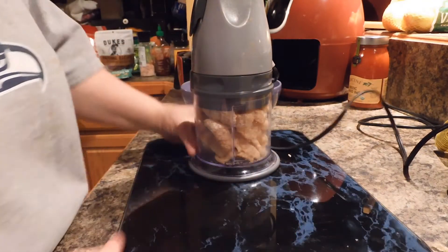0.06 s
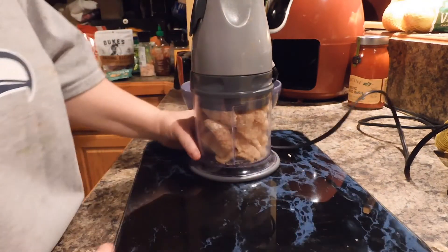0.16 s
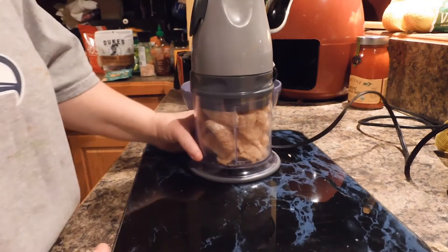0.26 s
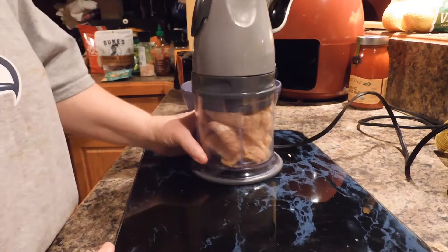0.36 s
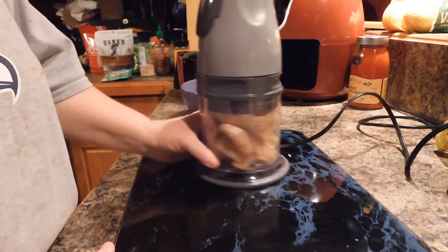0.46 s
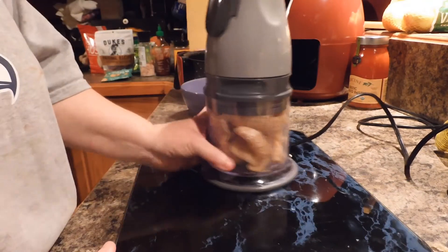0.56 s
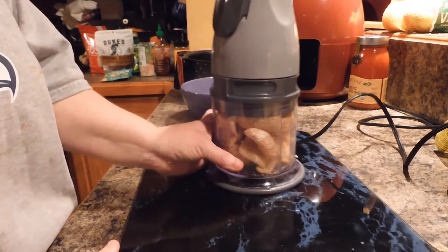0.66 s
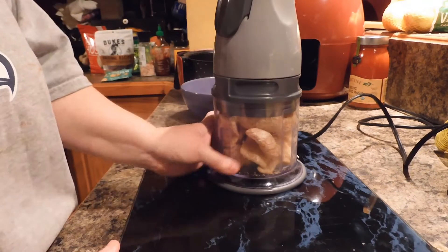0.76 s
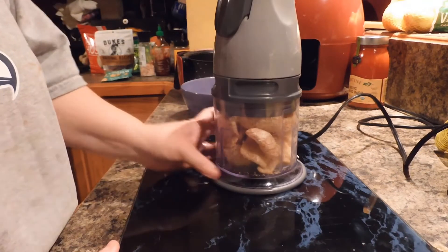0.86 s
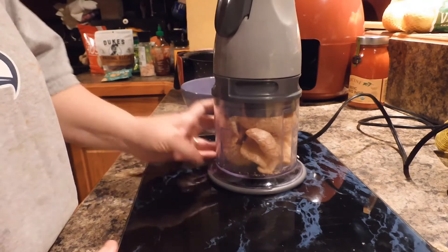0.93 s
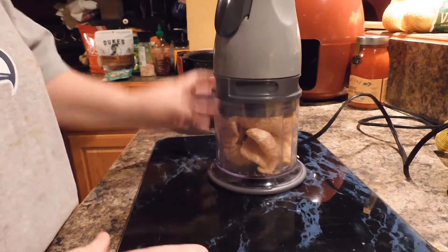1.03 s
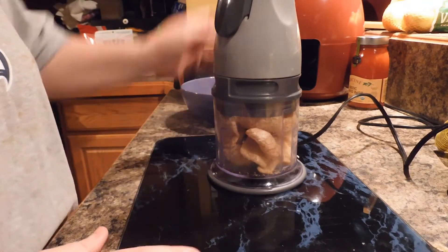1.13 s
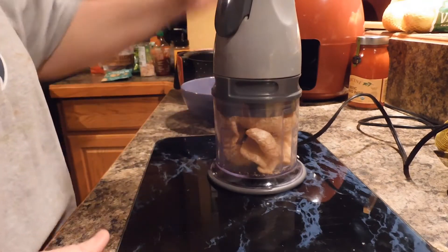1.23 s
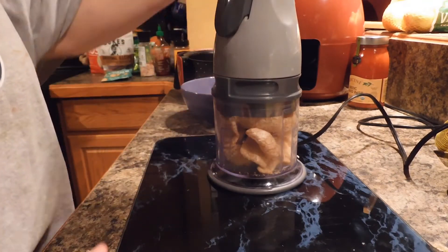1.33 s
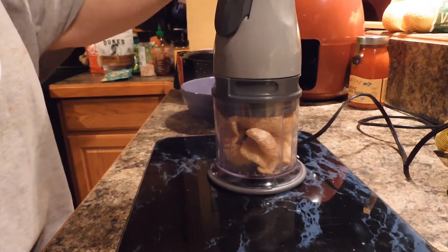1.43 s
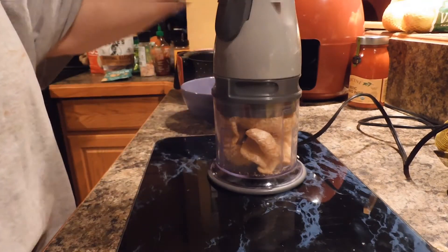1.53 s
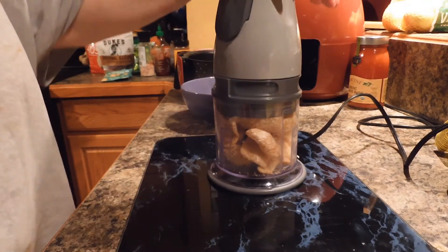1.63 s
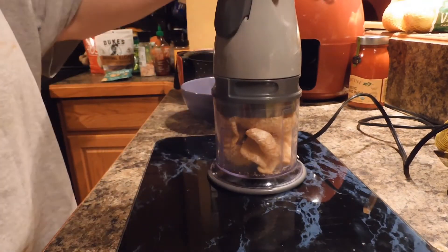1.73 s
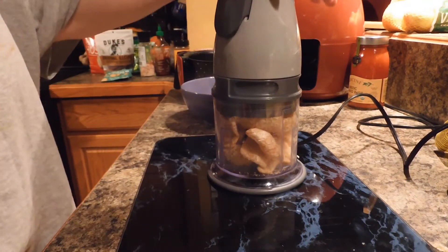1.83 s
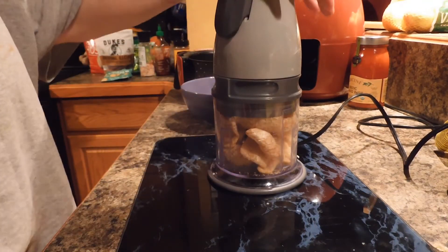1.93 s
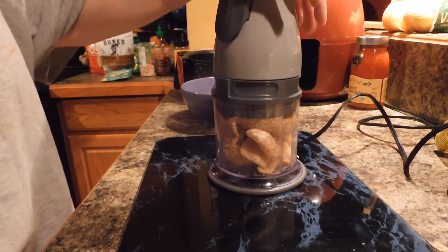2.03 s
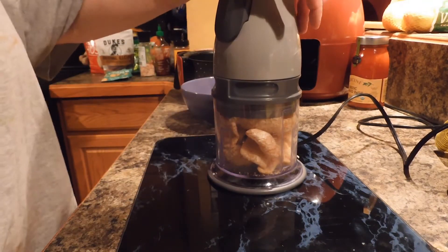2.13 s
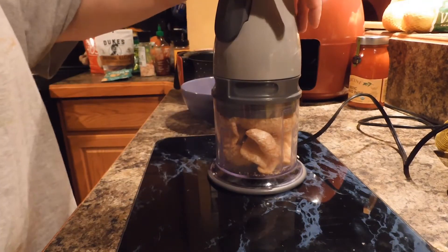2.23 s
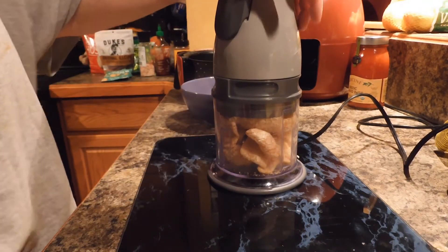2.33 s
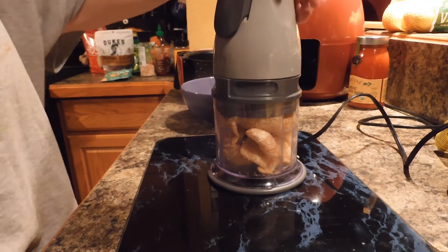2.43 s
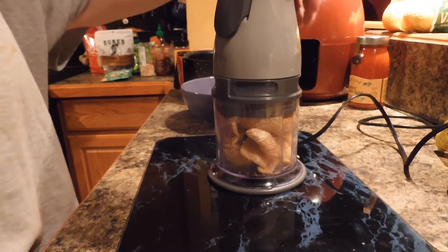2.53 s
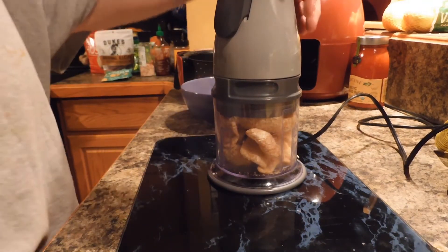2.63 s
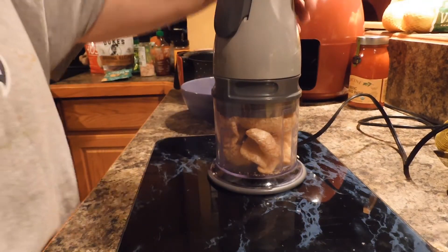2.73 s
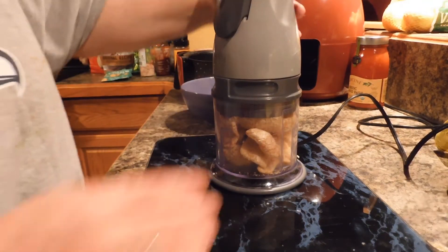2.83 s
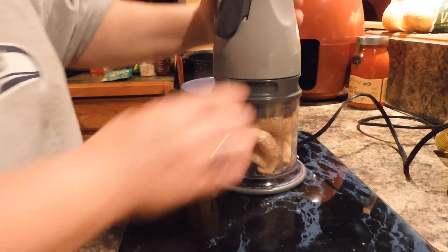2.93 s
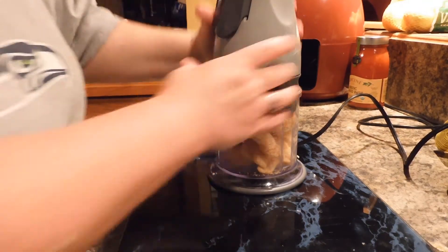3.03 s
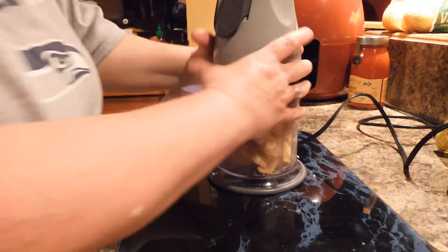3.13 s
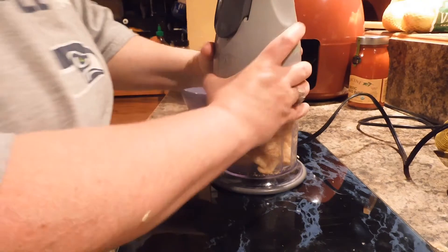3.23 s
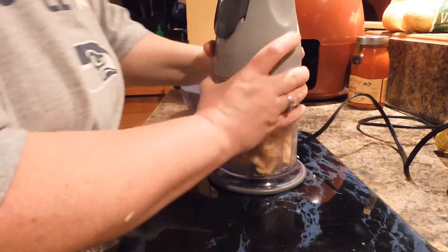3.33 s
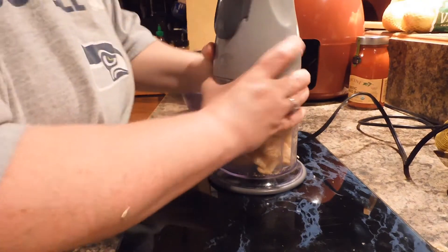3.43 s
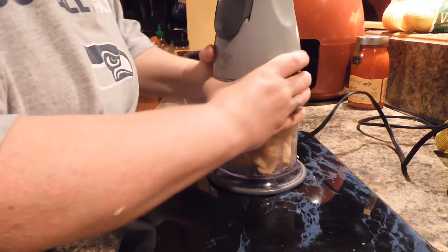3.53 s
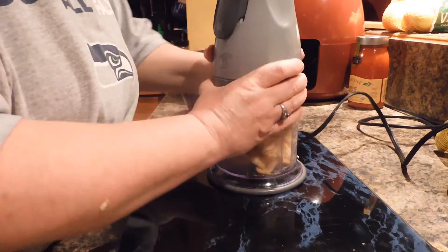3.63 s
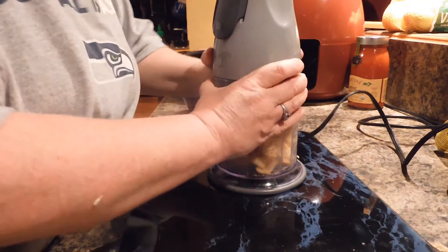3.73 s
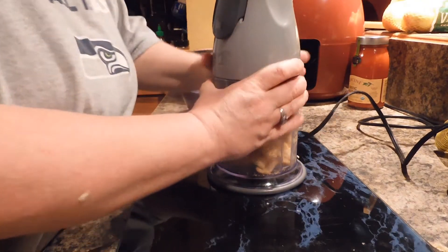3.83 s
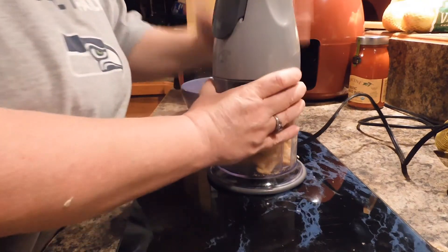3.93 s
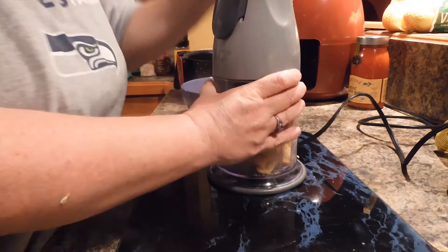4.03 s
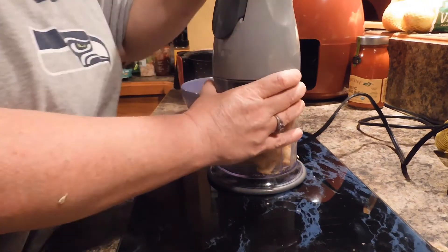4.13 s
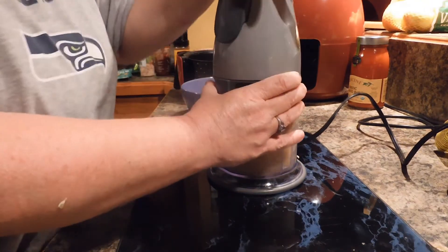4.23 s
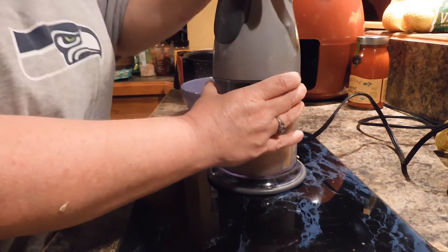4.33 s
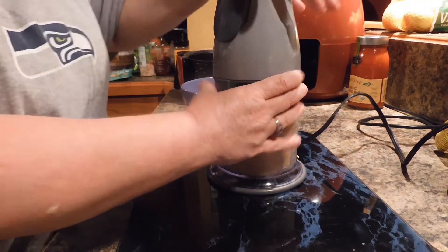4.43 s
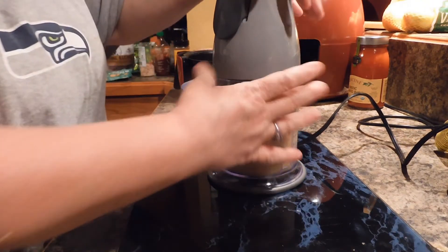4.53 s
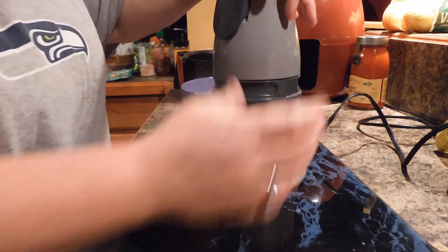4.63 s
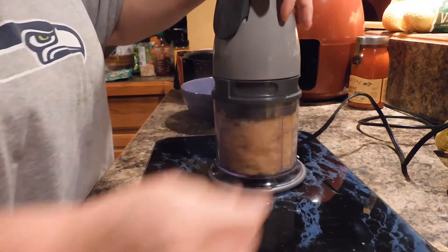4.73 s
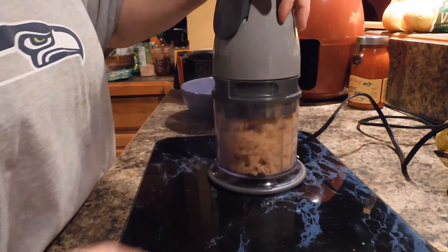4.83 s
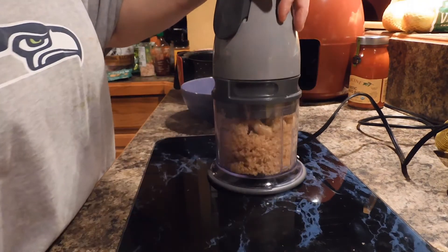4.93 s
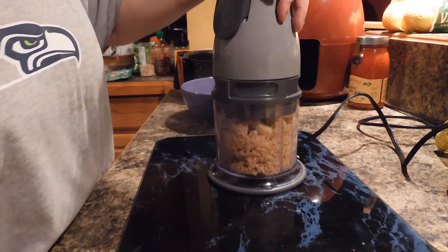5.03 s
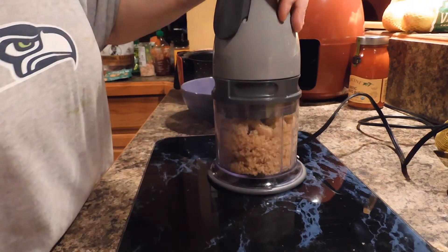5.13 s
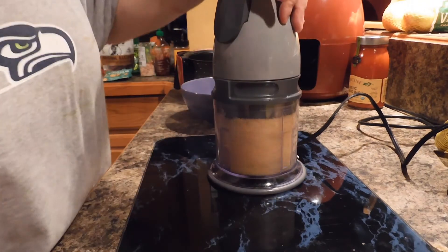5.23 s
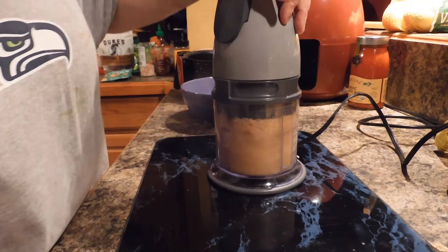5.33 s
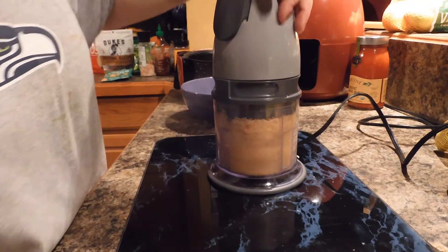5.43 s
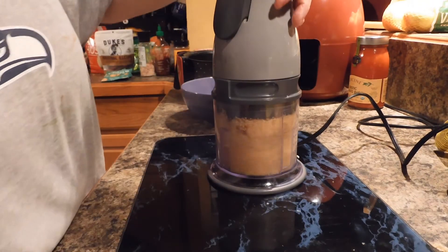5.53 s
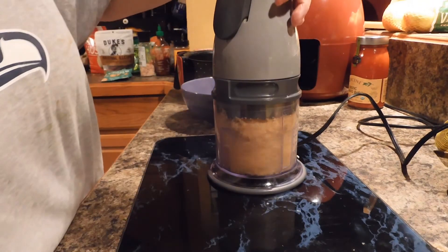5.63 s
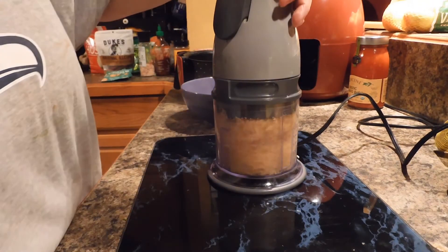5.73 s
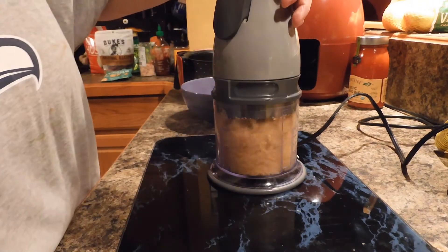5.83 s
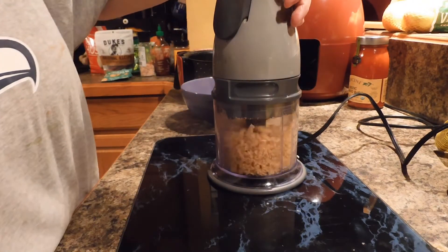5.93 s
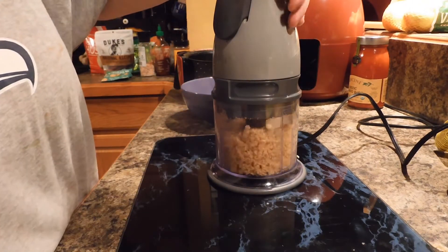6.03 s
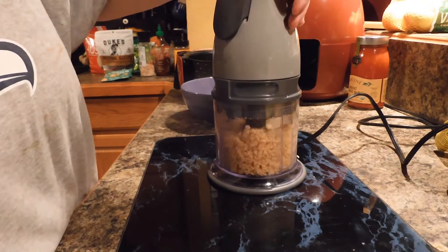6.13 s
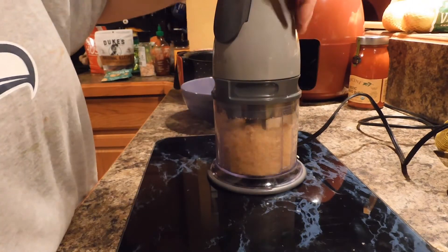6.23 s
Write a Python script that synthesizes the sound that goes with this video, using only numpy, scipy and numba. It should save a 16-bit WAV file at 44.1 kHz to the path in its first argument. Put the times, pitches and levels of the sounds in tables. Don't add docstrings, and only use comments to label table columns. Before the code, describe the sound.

Plastic snaps and soft hand pats on a cup lead to two brief, harsh grinding bursts cracking crunchy pieces in a hard-walled kitchen.

```python
import sys
import numpy as np
from scipy import signal
from scipy.fft import rfft, irfft, next_fast_len
from scipy.io import wavfile
from scipy.ndimage import uniform_filter1d
from numba import njit

SR = 44100
rng = np.random.default_rng(int(sys.argv[2]) if len(sys.argv) > 2 else 0)


def put_to_file(sound):
    columns = np.atleast_2d(sound).T
    safe = np.clip(columns, -1, 1)
    whole_steps = np.round(safe * 32767)
    wavfile.write(sys.argv[1], SR, whole_steps.astype(np.int16))


N = 276727
LEFT_RIGHT = np.array([[1], [-1]])


def undb(db):
    return 10 ** (np.asarray(db) / 20)


def unit(x):
    return x / np.sqrt(np.mean(x ** 2))


def filtered(x, order, cut_hz, kind="low"):
    return signal.sosfilt(signal.butter(order, cut_hz, kind, fs=SR, output="sos"), x)


def read(table, hz):
    f, v = np.transpose(table)
    return np.interp(np.log(np.maximum(hz, 1)), np.log(f), v)


def colour(x, table, modes=()):
    size = next_fast_len(x.shape[-1])
    hz = np.arange(size // 2 + 1) * SR / size
    gain = undb(read(table, hz))
    for centre_hz, width_hz, db in modes:
        detune = 2 * (hz - centre_hz) / width_hz
        gain = gain * (1 + 2 * undb(db) / (1 + detune ** 2))
    return irfft(rfft(x, size) * gain, size)[..., :x.shape[-1]]


@njit
def rings(n, start, step, decay, size):
    y = np.zeros(n)
    for k in range(len(start)):
        z, p, soft = size[k] + 0j, decay[k] * np.exp(1j * step[k]), 1.
        for i in range(start[k], min(n, start[k] + int(-6 / np.log(decay[k])))):
            y[i] += z.imag * (1 - soft)
            z *= p
            soft *= decay[k] ** 4
    return y


@njit
def follow(x, release):
    y, e = np.empty(len(x)), 0.
    for i in range(len(x)):
        e = max(x[i], e - release)
        y[i] = e
    return y


def shower(s, hz, cycles, size):
    hz = np.clip(hz, 60, .42 * SR)
    start = (np.clip(s, 0, N / SR) * SR).astype(np.int64)
    return rings(N, start, 2 * np.pi * hz / SR, np.exp(-hz / cycles / SR), size)


def knocks(s, db, hz, edge_db, thud_db, ms, lead, thud_hz, smear=1.0, soft=0.97, count=60):
    s, db, hz, edge_db, thud_db, ms = np.array(np.broadcast_arrays(s, db, hz, edge_db, thud_db, ms))[:, :, None]
    length_s = smear * np.clip(ms, 1, 12) / 1000
    parts = (
        (hz, 1.2, 1.6, db + 2.5),
        (9000 + 0 * hz, .6, 2.5, db + edge_db + 0.23),
        (thud_hz + 0 * hz, .9, 1.3, db + thud_db + 0.15))
    out = 0
    for centre_hz, spread, cycles, part_db in parts:
        late, more, order, sign = rng.random((len(s), 4, count)).transpose(1, 0, 2)
        place = (np.argsort(order) + order) / count * 2 - 1
        pitch = centre_hz * 2 ** (spread * (place + place ** 3) / 2)
        delay = -.25 * (np.log(1 - late) * (2 - soft) + np.log(1 - more) * soft)
        when = s + length_s * (delay - lead)
        share = np.sqrt(4 * length_s * pitch / cycles / count)
        size = undb(part_db - 5.9 * place ** 2) * share * np.sign(sign - .5)
        out = out + shower(when.ravel(), pitch.ravel(), cycles, size.ravel())
    return out


def grains(per_s, lo_hz, hi_hz, cycles, scatter_db):
    s, pitch, size = rng.random((3, int(per_s * N / SR)))
    hz = lo_hz + (hi_hz - lo_hz) * pitch
    return shower(s * N / SR, hz, cycles, undb(-scatter_db * np.log(size)) * np.sqrt(hz / hi_hz))


# f/Hz, level/dB per Hz
HISS_SPECTRUM = [(15, -52.5), (25, -13), (48, -21.5), (175, -11), (206, 0.5), (242, -13), (301, -5),
                 (344, -11.5), (427, 1.5), (560, -6.5), (624, 1.5), (911, -0.5), (3920, -2.5),
                 (7920, -18.5), (16000, -38.5)]
# f/Hz, likeness/0-1
HISS_LIKENESS = [(60, 0.95), (130, 0.51), (290, 1), (640, 0.93), (1410, 0.8), (3100, 0.3), (6820, 1),
                 (15000, 0.77)]
# f/Hz, level/dB rms
FRIDGE_HUM = [(59.5, -78), (120, -79), (211, -68), (800, -67), (2790, -65.5), (2850, -67)]


def background(loud):
    t = np.arange(N) / SR
    mid, side = colour(rng.standard_normal((2, N)), HISS_SPECTRUM)
    side_db = [(hz, 10 * np.log10(np.clip((1 - c) / (1 + c), 1e-3, 1))) for hz, c in HISS_LIKENESS]
    side = colour(side, side_db) * undb(-6.5)
    hiss = (mid + side * LEFT_RIGHT) * undb(-50.5) / np.sqrt(np.mean(mid ** 2))

    loud_db = 10 * np.log10(uniform_filter1d(loud ** 2, size=441) + 1e-12)
    over = np.clip((loud_db + 45) / 25, 0, 1)
    duck = uniform_filter1d(follow(over, 1.3 / SR), size=2000)
    bass = filtered(hiss, 1, 1200)
    top = filtered(hiss, 2, 6000, "high")
    middle = hiss - bass - top
    hiss = bass * undb(-2.5 * duck) + middle * undb(-4.5 * duck) + top * undb(-8.0 * duck)

    waver = unit(uniform_filter1d(rng.standard_normal((len(FRIDGE_HUM), N)), size=2500))
    hum = sum(undb(db + 1.5 + 1.7 * w) * np.sin(2 * np.pi * hz * t) for (hz, db), w in zip(FRIDGE_HUM, waver))
    return (hiss + hum * undb(-2.5 * duck)) * undb([[-.45], [.45]])


# t/s, level/dB, ring centre f/Hz, bright edge/dB re level, length/ms
LATCH_CLICKS = [(0.1519, -7.5, 5280, -8, 1.5), (1.5678, -18.5, 4500, -6, 4.4), (1.572, -12, 7000, -4, 2.7),
                (1.5756, -4, 3750, -14, 4.6), (1.7157, -24, 3610, -42, 3), (1.7221, -28.5, 3580, -32, 5),
                (2.003, -23.5, 5400, -14, 5), (2.019, -22, 3960, -8.5, 2.36),
                (2.0226, -21, 4400, -9.5, 3.9), (2.0293, -9.5, 3000, -17, 2.6),
                (2.0343, -26.5, 3380, -9, 5), (4.214, -44, 3500, -20.5, 1.1), (4.2201, -13, 4840, -6, 4.1),
                (4.2287, -0.5, 3500, -16.5, 3.5), (5.1966, -29, 3280, -27, 2.3),
                (5.2074, -28, 3500, -30, 2.4), (5.8546, -29.5, 3300, -12, 5.9),
                (6.2557, -24.5, 3460, -16, 2.8)]


def clicks():
    s, db, hz, edge_db, ms = np.transpose(LATCH_CLICKS)
    return knocks(s, db, hz, edge_db, -58 - db, ms, lead=0.66, thud_hz=560, count=120)


def kitchen(hands, chopper):
    t60_s, treble_t60_s, room_db = 0.29, 0.12, -11.5
    smear_hz, smear_s = 220, .004
    t = np.arange(int(.7 * SR)) / SR
    noise = rng.standard_normal((3, len(t))) * np.minimum(t / 0.001, 1)
    dull = filtered(noise, 2, 6000)
    tail = dull * undb(-60 * t / t60_s) + (noise - dull) * undb(-60 * t / treble_t60_s)
    side = undb(9) * filtered(tail[1], 2, 7000, "high") + 1.1 * tail[2]
    pair = (tail[0] + 0.33 * side * LEFT_RIGHT) / np.sqrt(np.sum(tail[0] ** 2))
    knock, grind = (signal.fftconvolve(x[None], pair, axes=1)[:, :N] for x in (hands, chopper))

    wander = unit(uniform_filter1d(rng.standard_normal(N), size=int(smear_s * SR)))
    drift = 2 * np.pi * np.cumsum(smear_hz * wander) / SR
    bass = filtered(knock, 2, 1000)
    blurred = (signal.hilbert(knock - bass, next_fast_len(N))[:, :N] * np.exp(1j * drift)).real
    return undb(room_db) * (bass + filtered(blurred, 2, 700, "high") + grind)


# t/s, scrape/dB, thud/dB, length/ms
CUP_JUDDER = [(0.478, -44.5, -48, 6.3), (0.4856, -34.5, -34, 3.2), (0.4952, -38, -29.5, 4.6),
              (0.5067, -29.5, -25, 3.7), (0.5157, -30.5, -35, 3), (0.5219, -26.5, -40, 4.4),
              (0.5272, -45, -34, 4.5), (0.5437, -50, -39, 7), (0.5545, -39, -42.5, 8.2),
              (0.566, -37, -37, 3), (0.5722, -25.5, -23.5, 3), (0.5764, -23.5, -20, 3.9),
              (0.5921, -31.5, -27.5, 6.6), (0.598, -31, -23, 4.8), (0.6036, -27.5, -30.5, 4.9),
              (0.618, -30.5, -32.5, 6), (0.6291, -19, -34, 2.33), (0.6342, -23, -23.5, 7),
              (0.6555, -27.5, -28.5, 8.3), (0.6719, -48, -27.5, 4.8), (0.6915, -46.5, -45.5, 6.9),
              (0.715, -49, -46.5, 7.5)]


def judder():
    s, db, thud_db, ms = np.transpose(CUP_JUDDER)
    return knocks(s, db, 3010, -24, thud_db - db, ms, lead=0.49, thud_hz=506, smear=1.3, soft=.7)


def thumps():
    t = np.arange(N) / SR
    latch = undb(-38.0) * np.exp(-((t - 1.575) / 0.0019) ** 2)
    motor = undb(-55) * np.exp(-((t - 5.25) / 0.0029) ** 2)
    return latch + motor


# t/s, level/dB, bright edge/dB re level, body thud/dB re level, length/ms
FINGER_GRIPS = [(1.7306, -43.5, -19, 3, 2.25), (2.3749, -38, -29, -10.5, 5.9),
                (2.415, -35, -31, -12.5, 2.9), (2.8336, -41, -27, -31.5, 2.2),
                (3.0808, -44.5, -24, -17.5, 13), (3.2027, -35.5, -21, -5.5, 3),
                (3.2981, -41, -24.5, 2.5, 3.1), (3.3291, -26.5, -10, -20, 3.2),
                (3.3617, -30.5, -5, -15, 2.5), (3.4743, -29, -26, -4.5, 6.9),
                (3.4877, -28.5, -3, -25.5, 7.5), (3.4978, -32.5, -13.5, -6, 3.7),
                (3.506, -22, -6.5, -8, 4.4), (3.6042, -44.5, -21, 1, 6.1), (3.6156, -25, -46, -4, 2.4),
                (3.687, -34.5, -33, -10, 2), (3.8504, -47, -31, 4.5, 11), (3.902, -32, -33, -28.5, 1.1),
                (3.9683, -44.5, -16, -2, 4.7), (4.867, -47.5, -6, -18, 12)]


def grips():
    s, db, edge_db, thud_db, ms = np.transpose(FINGER_GRIPS)
    return knocks(s, db, 3470, edge_db, thud_db, ms, lead=.35, thud_hz=716, soft=.4)


# start t/s, crumb level/dB, thinning/dB per s, run/s, coast/s
MOTOR_PULSES = [
    (4.228, -11, -33, 0.46, .19),
    (5.219, -14, -16.5, .44, 0.27),
]
# f/Hz, level/dB per Hz
CUP_SPECTRUM = [(590, -51), (1000, -34), (1480, -14), (1690, -2), (1920, -6), (2290, 3), (3400, 4),
                (3660, -6), (4040, -1), (6060, -1), (9000, -16.5), (11700, -47), (19800, -120)]
# f/Hz, width/Hz, level/dB
CUP_RESONANCES = [(1607, 280, -14.5), (1729, 90, -6), (3330, 200, -25.5), (3930, 360, -3.5),
                  (4560, 400, -5), (5900, 500, -11), (7590, 98, 2)]
# f/Hz, level/dB per Hz
BASE_SPECTRUM = [(59, -81), (100, -34.5), (164, -10.5), (194, -10.5), (341, -8.5), (738, 2.5), (1040, -6.5),
                 (1400, 0.5), (1820, -3.5), (3080, -120)]
# f/Hz, level/dB per Hz
DUST_SPECTRUM = [(3820, -37), (6500, 1.5), (7610, -1), (8990, -4), (9880, -7), (10700, 0.5), (12600, -3),
                 (16000, -25.5)]


def grinding():
    t = np.arange(N) / SR
    sweep = undb(unit(filtered(rng.standard_normal(N), 1, (30, 160), "band")))
    crumbs = grains(per_s=5000, lo_hz=861, hi_hz=9525, cycles=5.45, scatter_db=0.5)
    crumbs = unit(sweep * colour(crumbs, CUP_SPECTRUM, CUP_RESONANCES))
    rumble = grains(per_s=900, lo_hz=114.5, hi_hz=1513, cycles=4.7, scatter_db=2.0)
    rumble = unit(colour(rumble, BASE_SPECTRUM))
    dust = grains(per_s=6000, lo_hz=5660, hi_hz=16160, cycles=3.3, scatter_db=3.5)
    dust = unit(sweep * colour(dust, DUST_SPECTRUM))

    out = np.zeros(N)
    for start_s, db, thin_db_per_s, run_s, coast_s in MOTOR_PULSES:
        since = np.maximum(t - start_s, 0)
        running = np.minimum(since, run_s)
        coast = np.clip(since - run_s, 0, coast_s)
        slowed = coast / coast_s
        stopped = np.maximum(since - run_s - coast_s, 0)
        spin_up_db = -5 * np.exp(-since / 0.0083)
        release_db = -3 * (1 - np.exp(-coast / .015))
        level_db = db + spin_up_db + thin_db_per_s * running + release_db - 18.5 * slowed - 330 * stopped

        kick = np.exp(-since / 0.054)
        rumble_db = -20 + 15 * kick + 7.5 * running + 10.5 * slowed
        dust_db = -8 + 0.5 * kick - 2 * slowed
        build = 1 - np.exp(-since / 0.013)
        mix = crumbs + undb(rumble_db) * build * rumble + undb(dust_db) * dust
        out += (t > start_s) * undb(level_db) * mix
    return out


# t/s, level/dB, length/ms
BLADE_SNAPS = [(4.2398, -15, 2.3), (4.2472, -5, 8.8), (4.2907, -8.5, 9.6), (4.31, -17, 3),
               (4.3215, -10.5, 3.9), (4.3436, -10.5, 2.36), (4.3852, -24.5, 5.6), (4.4006, -14.5, 7.3),
               (4.4168, -12.5, 5.3), (4.4288, -19, 1.4), (4.4375, -7.5, 0.84), (4.4764, -16.5, 13),
               (4.491, -23, 2.7), (4.5056, -37, 14), (4.5753, -17, 14), (4.5904, -12.5, 5.5),
               (4.5969, -27, 10), (4.63, -23, 7), (4.6639, -14.5, 4.2),
               (5.223, -18, 4.3), (5.23, -15, 7.3), (5.2535, -7.5, 7), (5.2844, -7, 4.5),
                (5.3037, -10.5, 7.5), (5.3326, -17, 7.5), (5.3463, -6.5, 7), (5.3902, -21, 13.7),
                (5.424, -21, 8.2), (5.436, -14.5, 10.5), (5.4653, -12.5, 8.8), (5.535, -10.5, 3.7),
                (5.5619, -13.5, 5.9), (5.6116, -20.5, 13), (5.6267, -16, 3.5), (5.6365, -16, 4.2),
                (5.6616, -22.5, 2.4), (5.6982, -30.5, 6.8), (5.7454, -21.5, 12), (5.7588, -20.5, 13.8),
                (5.7754, -20.5, 8.8), (5.7948, -20.5, 5.8), (5.812, -30, 14), (5.832, -30, 12),
                (5.885, -38, 14)]


def snaps():
    s, db, ms = np.transpose(BLADE_SNAPS)
    return undb(-2.5) * knocks(s, db, 4400, -13, -27, ms, lead=.55, thud_hz=780)


# f/Hz, level/dB
MIC_RESPONSE = [(60, -47), (130, -17.5), (190, 1.5), (300, -4.5), (9000, 0.5), (12000, -13), (16000, 0)]


def scene():
    hands = clicks() + judder() + grips()
    chopper = grinding() + snaps()
    hands, chopper = colour(np.array([hands, chopper]), MIC_RESPONSE)
    near = hands * undb([[-.4], [.4]]) + chopper * undb([[-.08], [.08]]) + thumps() * undb([[-1.6], [1.6]])
    return near + kitchen(hands, chopper) + background(hands + chopper)


# f/Hz, step/dB
ROUNDING_STEP = [(150, -22), (1000, -11), (3000, -6), (6000, -2), (9000, 3), (12000, 6), (16000, 8)]
# f/Hz, in quiet/spreads, when drained/spreads
MID_KEPT = [(9000, 4, 4), (11500, 4, 1.4), (14000, 3, .8), (14800, 2, -.7), (16000, 2, -1)]
# f/Hz, in quiet/spreads, when drained/spreads
SIDE_KEPT = [(900, 3, 1.2), (1100, 3, -1.1), (3300, 3, -.9), (3700, 3, 3), (6200, 3, 3), (6400, -2, -.2),
             (10000, -1, .2), (15500, -1, -1.3)]
# f/Hz, lift/dB
SIDE_TREBLE = [(1500, 0), (6000, 0), (7000, 7), (12000, 9)]


def coarse(x, memory_s, patchy_db):
    frame = dict(fs=SR, window="cosine", nperseg=2048, noverlap=1024)
    hz, t, z = signal.stft(np.array([x[0] + x[1], colour(x[0] - x[1], SIDE_TREBLE)]) / 2, **frame)
    hop_s = t[1] - t[0]
    power = np.abs(z) ** 2 + 1e-18
    loudness = power[0].mean(axis=0)
    over_db = 10 * np.log10(loudness / np.median(loudness))
    keep = np.exp(-hop_s / memory_s)
    held_db = follow(over_db, 200 * hop_s)
    recent_db = signal.lfilter([1 - keep], [1, -keep], held_db)
    drained_db = .3 * recent_db + .5 * (recent_db - over_db)
    strain = np.clip(np.minimum(held_db, np.roll(held_db, 1)) / 36, 0, 1)
    fresh = np.clip(over_db - np.roll(over_db, 2) - 4, 0, 4)
    starved_db = 5 * strain * (hz > 9000)[:, None] - 3 * fresh

    band = (40 * np.log1p(hz / 4000)).astype(int)
    chance = uniform_filter1d(rng.standard_normal((2, 2, band[-1] + 1, len(t))), size=2)
    step_db = np.minimum(read(ROUNDING_STEP, hz)[:, None] + drained_db + starved_db, 8.5)
    step_db = step_db + patchy_db * chance[0][:, band]
    step = np.sqrt(uniform_filter1d(power, size=41, axis=1)) * undb(step_db)

    odds = []
    for table in (MID_KEPT, SIDE_KEPT):
        quiet = read(np.array(table)[:, [0, 1]], hz)[:, None]
        drained = read(np.array(table)[:, [0, 2]], hz)[:, None]
        odds.append(quiet * (1 - strain) + drained * strain)
    kept = np.array(odds) + fresh + np.sqrt(2) * chance[1][:, band // 2] > 0
    z = z * (hz < 15900)[:, None] * kept
    lines = np.abs(z) / step + 1e-9
    rounded = z * np.floor(lines ** .75 + .4) ** (4 / 3) / lines
    mid, side = signal.istft(rounded, **frame)[1][:, :N]
    return np.array([mid + side, mid - side])


def roll_off(x):
    return signal.sosfilt(signal.butter(12, 16330, fs=SR, output="sos"), x)


def record(dry):
    excess = filtered(dry - np.clip(dry, -.97, .97), 2, 250, "high")
    stored = coarse(dry - excess, memory_s=.3, patchy_db=4.2)
    return roll_off(stored)


dry = scene()
out = record(dry)
put_to_file(out)
```